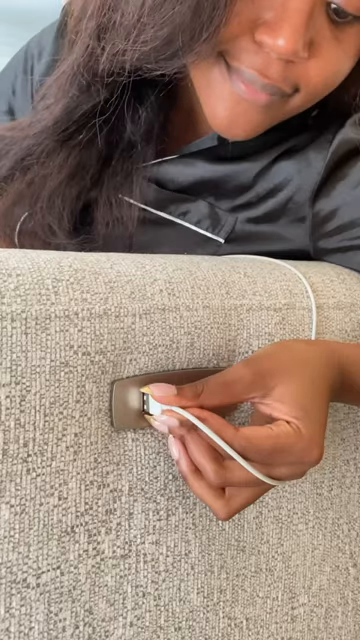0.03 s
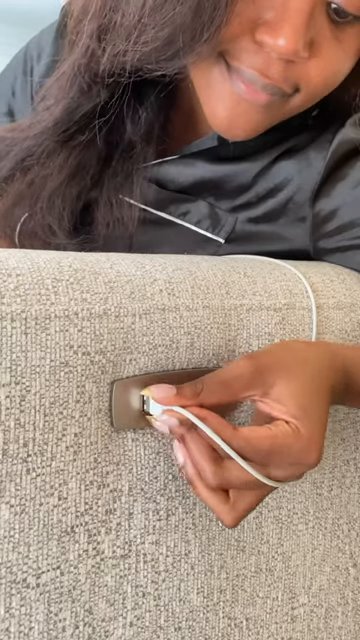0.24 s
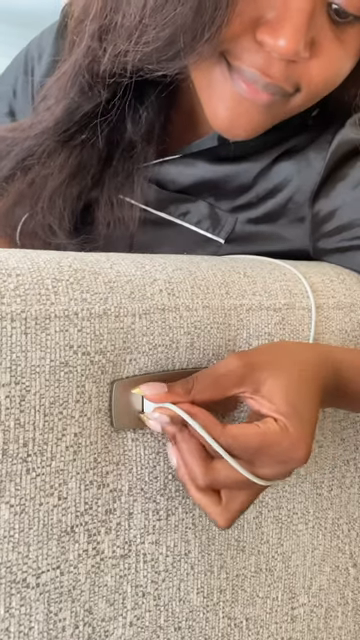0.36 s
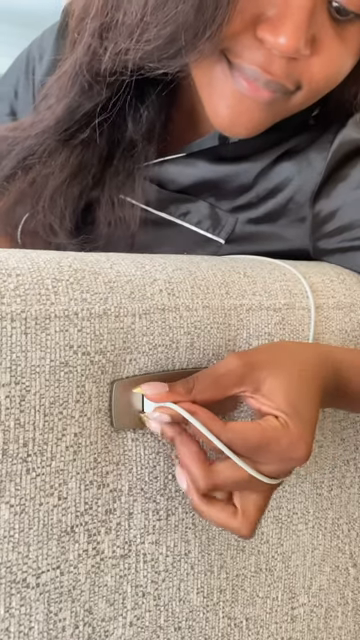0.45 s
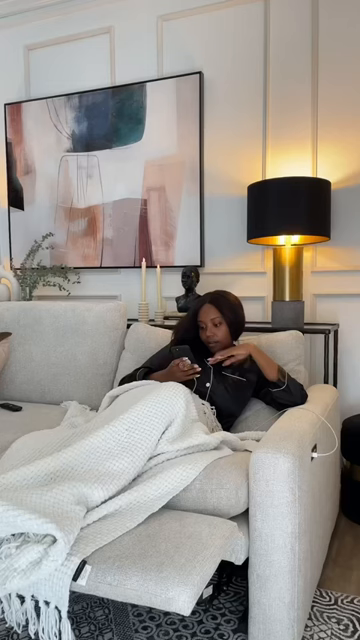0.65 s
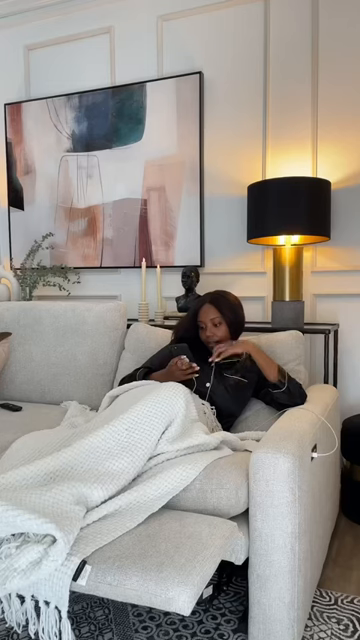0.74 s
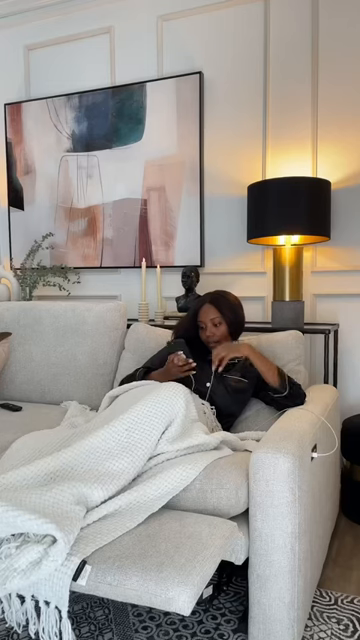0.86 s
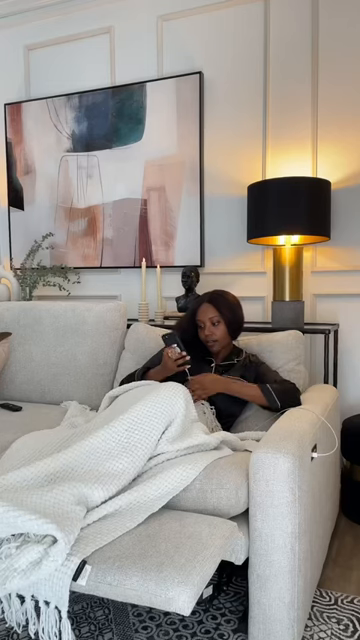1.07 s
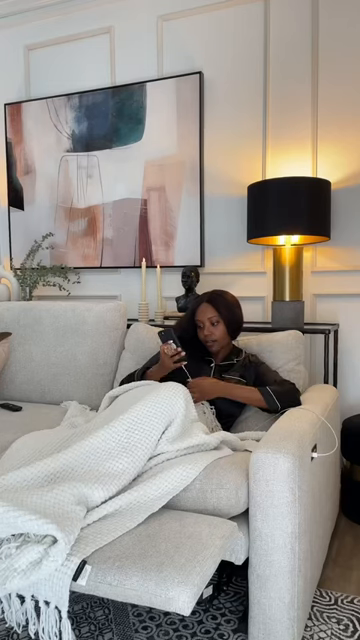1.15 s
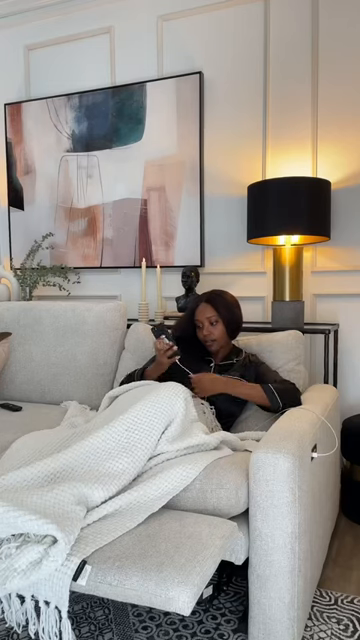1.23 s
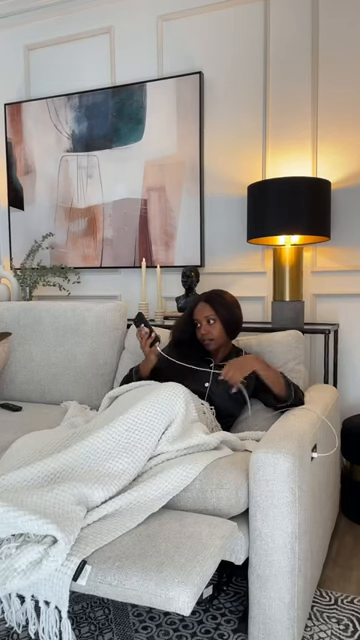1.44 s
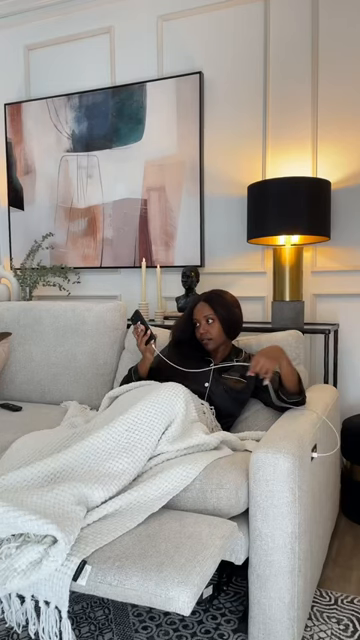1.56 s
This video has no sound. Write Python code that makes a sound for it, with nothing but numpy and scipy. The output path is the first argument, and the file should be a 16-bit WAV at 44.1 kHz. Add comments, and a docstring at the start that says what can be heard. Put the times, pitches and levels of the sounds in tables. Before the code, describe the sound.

A cable plug snaps into a sofa's socket, close by, over low room hum.

```python
"""Plugging a cable into a sofa

In a quiet living room, a plug is pushed into a socket in a sofa arm, very close by. Its metal shell
scrapes in, snaps home and thumps the padded panel. It ticks once more as the fingers let go and brush
the fabric. Then we jump across the room, where the ventilation rumble and mains hum are louder."""
import sys
import numpy as np
from scipy import signal
from scipy.fft import rfft, irfft
from scipy.io import wavfile
from scipy.ndimage import uniform_filter1d

SR = 44100
rng = np.random.default_rng(int(sys.argv[2]) if len(sys.argv) > 2 else 0)


def inscribe(sig):
    """Save sig as 16-bit PCM at rate SR to the path in sys.argv[1].

    A 1-D sig is mono; a 2-D sig holds one channel per row.
    Samples are clipped to [-1, 1] before scaling.
    """
    pcm = np.round(np.clip(np.atleast_2d(sig).T, -1, 1) * 32767)
    wavfile.write(sys.argv[1], SR, pcm.astype(np.int16))


N = 70560

# A "colour" says how strong each pitch is, from bass to treble.
# Colour of the ventilation by the sofa and across the room. Each row: pitch in Hz, level in dB.
NEAR_AIR_COLOUR = [(15, -30.5), (25, -7.5), (67, 0.5), (106, -13.5), (186, -10), (243, -14), (344, -12),
                   (383, -10.5), (427, -27.5), (673, -38.5), (833, -35), (1350, -46), (1910, -46),
                   (2300, -45), (2500, -49.5), (6540, -56.5), (8550, -69.5), (11200, -60), (15000, -65)]
FAR_AIR_COLOUR = [(15, -53), (25, -22.5), (44, -3), (105, -3.5), (128, -3.5), (146, -11), (186, -13.5),
                  (231, -15), (278, -23), (309, -17), (373, -27), (404, -23.5), (438, -29), (790, -26.5),
                  (2020, -53), (5280, -60.5), (7890, -73.5), (12800, -68.5), (15000, -89)]
# How wide that air sounds. Each row: pitch in Hz, level in dB of the part opposite in left and right.
NEAR_WIDTH = [(60, -22.5), (110, -19), (200, -13), (380, -5.5), (700, 5), (1290, 3.5), (2380, -2.5),
              (4400, -7), (8120, 9.5), (15000, -11)]
FAR_WIDTH = [(60, -32), (110, -23), (200, -15), (380, -1.5), (700, -1), (1290, 1), (2380, 1), (4400, -5.5),
             (8120, 9.5), (15000, -16.5)]
# Humming tones. Each row: pitch in Hz, level in dB by the sofa, level in dB across the room.
HUM_TONES = [(92.6, -71, -55.5), (120.44, -63.5, -56), (308.4, -67, -69.5)]
# The shell rubbing in the socket.
# Each row: start in seconds, length in seconds, level in dB, treble tilt in dB per octave.
SCRAPES = [(0.157, 0.0077, -61.5, -6.5), (0.1845, 0.0058, -44.5, 1.5), (0.1919, 0.017, -42.5, -0.3),
           (0.2091, 0.0054, -44.5, 1.1), (0.2153, 0.0044, -42.5, -3.5), (0.22, .012, -56, -2),
           (0.257, 0.0075, -57, -2)]
# Colour of the rubbing. Each row: pitch in Hz, level in dB.
SCRAPE_COLOUR = [(30, -42), (120, -0.5), (250, 1), (600, 1.5), (1000, -2.5), (1600, -13), (2050, -9),
                 (2700, -17.5), (3400, -18), (4100, -28), (5300, -21), (7500, -30), (8800, -34),
                 (10200, -24.5), (11500, -39), (15000, -34)]
# The notes that the socket housing, the padded panel and the sofa frame ring with.
# Each row: pitch in Hz, level in dB, seconds to fade by 60 dB.
HOUSING_NOTES = [(572, -5, 0.042), (642.4, -1.5, 0.054), (828, -2, 0.027), (877, -10.5, 0.067),
                 (1042, 2.5, 0.033), (1175, -8, 0.073), (1406, -5.5, 0.042), (1730, -7, 0.028),
                 (1930, -2.5, 0.019), (2455, -9, 0.017), (2980, -9, 0.031), (3550, -11, 0.012),
                 (4950, 0, 0.0088), (6680, -12.5, 0.0084)]
PANEL_NOTES = [(186, -28, .3), (192.5, -2, 0.084), (227.2, 6.5, 0.11), (280.7, -6, 0.063),
               (452, -12.5, .11), (544, -10.5, 0.048)]
FRAME_NOTES = [(83.3, -4.2, 0.042)]
# Pushes on the sofa arm.
# Each row: start in seconds, panel level in dB, frame level in dB, length in seconds.
PUSHES = [(0.1881, -7, -2.5, 0.0062), (.1994, -5, -5, .0079), (0.2233, 1, 4.5, 0.0089),
          (0.2722, -3, -0.5, 0.0022), (.2816, 4.5, 3, 0.00555)]
# The plug knocking on the socket.
# Each row: start in seconds, level in dB, treble tilt in dB per octave, contact length in seconds.
CLICKS = [(0.2146, -15, 2.5, 0.00066), (0.2690, -11, 0.5, 0.001), (.2706, -14, -0.5, 0.00099),
          (0.2714, -1.5, 0.5, 0.0005), (0.2728, -5.5, -1.5, 0.0027), (0.2739, -6, -2.5, .0012)]
# Colours of the knocks, the snap sent into the room, the last tick, the brushed fabric, the click at
# the jump and the room's echo. Each row: pitch in Hz, level in dB.
CLICK_COLOUR = [(30, -40), (150, -6.5), (520, 7.5), (800, 4), (1050, 0.5), (1500, -1), (2000, -0.5),
                (2500, -3.5), (3000, -13), (3700, -10.5), (4200, -17), (5000, -23), (5800, -24),
                (6500, -13.5), (7200, -25), (7900, -17), (9000, -25), (13000, -31.5), (15500, -27)]
SNAP_COLOUR = [(30, -36), (200, -2), (500, 5.5), (1000, -2), (1700, -1), (2300, -9.5), (3000, -7),
               (3800, -17), (5000, -12.5), (7000, -31.5), (10000, -35.5), (15000, -26.5)]
TICK_COLOUR = [(200, -11), (600, -7), (1100, 5), (1600, -1), (2100, -3.5), (3000, -18), (4200, -29),
               (5500, -14.5), (7000, -27), (9000, -25.5), (12000, -27), (15000, -16.5)]
BRUSH_COLOUR = [(500, -14), (1500, -3), (2500, 2.5), (4000, -5), (6000, -4), (8000, -18), (15000, -15)]
JUMP_COLOUR = [(500, 0), (2000, -7), (8000, -17), (15000, -21)]
ROOM_COLOUR = [(60, -12.5), (200, -7.5), (500, 0), (2000, -5), (6000, 0), (15000, -5.5)]
# How much louder close sounds are on the left. Each row: pitch in Hz, left minus right in dB.
LEFT_BALANCE = [(60, 0), (200, -.5), (380, -.5), (700, 1), (1290, 2), (2380, 1), (4400, 0), (15000, 0)]
# How far ahead their waves are on the left. Each row: pitch in Hz, lead in radians.
LEFT_LEAD = [(700, .3), (1100, .6), (1500, .4), (2400, -.6), (3100, -.8), (5100, -.3), (6700, -1.7),
             (7800, -2.3), (8700, -3.1), (10500, -4.3), (12000, -5.4), (15000, -7.4)]

JUMP_S = 0.6187  # when we jump across the room


def undb(db):
    """Turn decibels into a number to multiply by."""
    return 10 ** (np.asarray(db) / 20)


def curve(points):
    """Draw a line through a table's points to get a value for every pitch."""
    hz, value = np.array(points, float).T
    return np.interp(np.log(np.fft.rfftfreq(N, 1 / SR) + 1), np.log(hz), value)


def unit(x):
    """Scale a signal to an average strength (rms) of one."""
    return x / np.sqrt(np.mean(x ** 2))


def band(order, hz, kind):
    """Make a filter that keeps the "low" or the "high" side of a pitch."""
    return signal.butter(order, hz, kind, fs=SR, output="sos")


def tint(x, colour, tilt_db=0):
    """Give a sound a colour; a positive tilt makes it brighter."""
    octave = np.log2(np.fft.rfftfreq(N, 1 / SR) + 200)
    cepstrum = irfft(np.log(unit(undb(curve(colour) + tilt_db * octave))), N)
    # Fold it so that the ringing comes after each hit, never before.
    cepstrum[1:N // 2] *= 2
    cepstrum[N // 2 + 1:] = 0
    return irfft(rfft(x) * np.exp(rfft(cepstrum)), N)


def impulse(at):
    """One sharp tap at the given time."""
    return 1. * (np.arange(N) == int(at * SR))


def fade(t, seconds):
    """Die away by 60 dB in the given time."""
    return np.exp(-np.log(1000) * t / seconds)


def ring(t, notes):
    """A struck object rings with several fading notes at once."""
    return sum(undb(db) * np.sin(2 * np.pi * hz * t) * fade(t, seconds) for hz, db, seconds in notes)


def contact(t, at, length, grit):
    """A sharp tap with a brief crunch behind it."""
    crunch = rng.standard_normal(N) * (t >= at) * np.exp(-abs(t - at) / length)
    return grit * crunch / np.linalg.norm(crunch) + impulse(at)


def wander(per_s):
    """A slow random drift up and down."""
    step = int(SR / per_s)
    return uniform_filter1d(np.repeat(rng.standard_normal(N // step + 1), step), step)[:N]


def ventilation(colour, width, db):
    """Moving air makes a steady noise, centred in the bass and wider above."""
    mid, side = rfft(rng.standard_normal((2, N))) * undb(curve(colour))
    mid, side = irfft(mid, N), irfft(side * undb(curve(width)), N)
    return undb(db) * np.array([mid + side, mid - side]) / mid.std()


def hum(t, hz, waver_db=2):
    """One humming tone that wavers a little in pitch and loudness."""
    phase = 2 * np.pi * (hz * t + rng.random()) + 0.65 * wander(5)
    return np.sqrt(2) * np.sin(phase) * undb(waver_db * wander(6.24))


def scrapes(t, slips_per_s=8300, scatter_db=2.5, rise_s=0.0022, fall_s=0.002, housing_db=-10.5):
    """The metal shell slides in by many tiny slips, and the housing sings along."""
    out = 0
    for at, length, db, tilt in SCRAPES:
        slips = (rng.random(N) < slips_per_s / SR) * rng.choice([-1, 1], N)
        slips = slips * undb(scatter_db * rng.standard_normal(N))
        slips *= np.clip((t - at) / rise_s, 0, 1) * np.exp(-np.maximum(t - at - length, 0) / fall_s)
        slips *= np.sqrt(length * SR / (np.sum(slips ** 2) + 1e-12))
        soft = signal.sosfilt(band(2, 2420, "low"), slips)  # soft slips barely ring the high notes
        out += undb(db) * (tint(slips, SCRAPE_COLOUR, tilt) + undb(housing_db) * housing(soft, t))
    return out


def housing(x, t):
    """The socket housing rings when shaken; neighbouring notes swing in opposite directions."""
    ringing = ring(t, HOUSING_NOTES[::2]) - ring(t, HOUSING_NOTES[1::2])
    return signal.fftconvolve(x, ringing / np.linalg.norm(ringing))[:N]


def thumps(t, gain_db=-21.5, rise_s=0.0016, lowest_hz=51):
    """Pushes shake the sofa arm's panel and frame; a longer push stirs only the lowest notes."""
    low_cut = band(3, lowest_hz, "high")
    rise = 1 - np.exp(-t / rise_s)
    panel = signal.sosfilt(low_cut, ring(t, PANEL_NOTES) * rise)
    frame = signal.sosfilt(low_cut, ring(t, FRAME_NOTES) * rise)
    out = 0
    for at, panel_db, frame_db, length in PUSHES:
        push = np.sin(np.pi * np.clip((t - at) / length, 0, 1)) ** 2
        arm = undb(panel_db) * panel + undb(frame_db) * frame
        out += signal.fftconvolve(push / push.sum(), arm)[:N]
    return undb(gain_db) * out


def clicks(t, gain_db=-13, latch_s=0.2722, latch_db=-12):
    """The plug rattles in the socket; springs drop into their notches and ring the housing."""
    knocks = sum(undb(gain_db + db) * tint(contact(t, at, length, grit=0.7), CLICK_COLOUR, tilt)
                 for at, db, tilt, length in CLICKS)
    return knocks + undb(latch_db) * housing(impulse(latch_s), t)


def tick(t, at=0.3925, db=-37.5, length_s=0.0028, housing_db=-5.5):
    """The plug settles softly as the fingers let go, and the housing rings briefly."""
    touch = tint(contact(t, at, length_s, grit=0.99), TICK_COLOUR)
    return undb(db) * (touch + undb(housing_db) * housing(impulse(at), t))


def brush(t, start_s=0.5, end_s=0.618, db=-87.5, threads_per_s=130, rise_s=0.016, scatter_db=5):
    """Skin catches on single threads of the fabric, making faint, separate ticks."""
    threads = (rng.random(N) < threads_per_s / SR) * undb(scatter_db * rng.uniform(-1, 1, N))
    pressure = np.clip((t - start_s) / rise_s, 0, 1) * (t < end_s)
    return undb(db) * tint(unit(threads) * pressure, BRUSH_COLOUR)


def jump(near, far, t, edge_s=0.0027, rise_s=0.016, hiss_above_hz=2000, click_db=-54.5):
    """The near background stops with a faint click and the far one comes in, hiss first."""
    near = near * np.clip(np.minimum(t, JUMP_S - t) / edge_s, 0, 1)
    rumble = signal.sosfiltfilt(band(4, hiss_above_hz, "low"), far)
    hiss = far - rumble
    far = rumble * np.clip((t - JUMP_S) / rise_s, 0, 1) + hiss * (t >= JUMP_S)
    return near + far + undb(click_db) * tint(impulse(JUMP_S), JUMP_COLOUR)


def close_stereo(x, alike_below_hz=1200):
    """Close sound reaches left and right at slightly different levels and times; bass arrives alike."""
    lead = curve(LEFT_LEAD) * np.minimum(np.fft.rfftfreq(N, 1 / SR) / alike_below_hz, 1)
    left = undb(curve(LEFT_BALANCE) / 2) * np.exp(.5j * lead)
    return irfft(rfft(x) * np.array([left, 1 / left]), N)


def room(x, t, db=-15, fade_s=0.39, treble_fade_s=0.23, build_s=0.0032):
    """A furnished room gives a short echo whose treble dies first."""
    mid, side = rng.standard_normal((2, N))
    side = signal.sosfilt(band(2, 350, "high"), side)  # bass is alike on both sides
    noise = tint(np.array([mid + side, mid - side]), ROOM_COLOUR)
    low = signal.sosfilt(band(2, 3000, "low"), noise)
    echo = low * fade(t, fade_s) + (noise - low) * fade(t, treble_fade_s)
    echo = unit(echo * (1 - np.exp(-t / build_s))) / np.sqrt(N)
    return undb(db) * signal.fftconvolve(x[None], echo, axes=1)[:, :N]


def scene(snap_s=0.2717, snap_db=-9.5):
    """Mix plug, sofa and background; the room echoes the snap as one even crack."""
    t = np.arange(N) / SR
    handling = scrapes(t) + thumps(t) + tick(t) + brush(t)
    snap = undb(snap_db) * tint(impulse(snap_s), SNAP_COLOUR)
    plug = close_stereo(clicks(t) + handling) + room(snap + handling, t)
    near = ventilation(NEAR_AIR_COLOUR, NEAR_WIDTH, db=-57)
    far = ventilation(FAR_AIR_COLOUR, FAR_WIDTH, db=-49.5)
    for hz, near_db, far_db in HUM_TONES:
        tone = hum(t, hz)
        near += undb(near_db) * tone
        far += undb(far_db) * tone
    return plug + jump(near, far, t)


def record(dry):
    """Trim the deepest bass (below 33 Hz) and the highest treble (above 15550 Hz)."""
    dry = signal.sosfilt(band(4, 33, "high"), dry)
    return signal.sosfilt(signal.ellip(10, .2, 70, 15550, fs=SR, output="sos"), dry)


dry = scene()
out = record(dry)
inscribe(out)
```